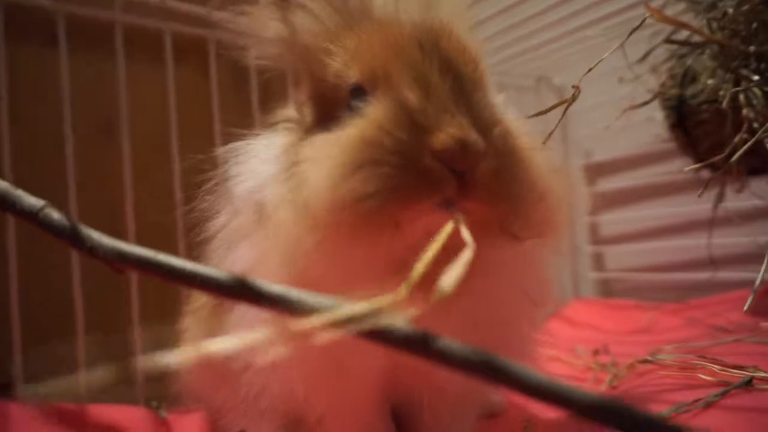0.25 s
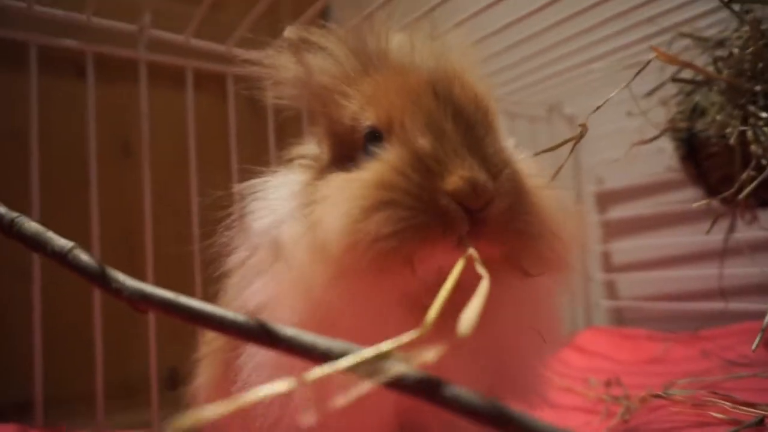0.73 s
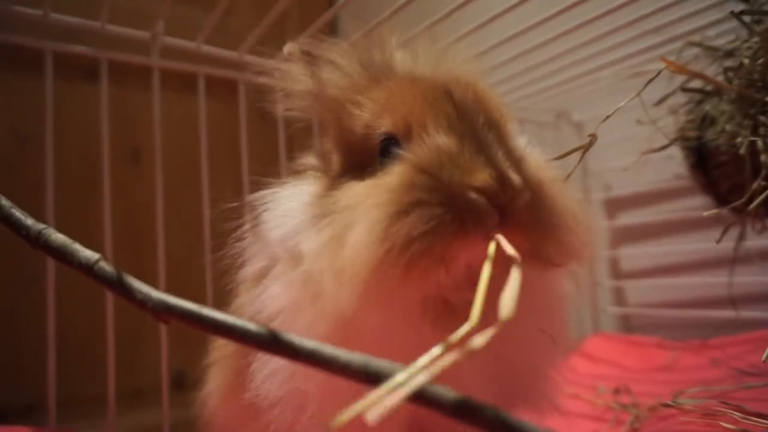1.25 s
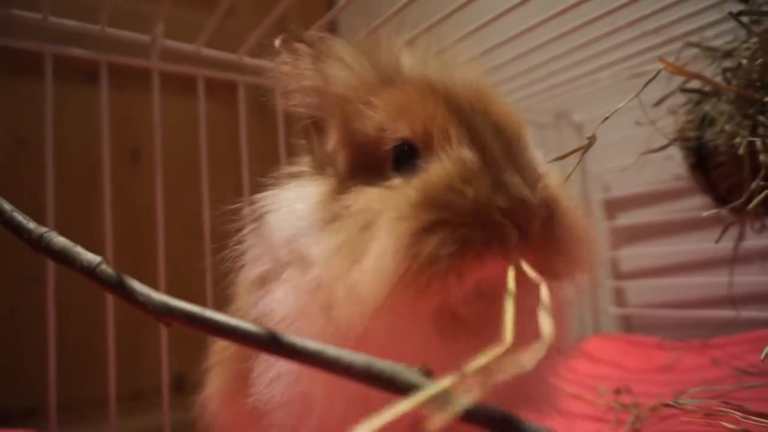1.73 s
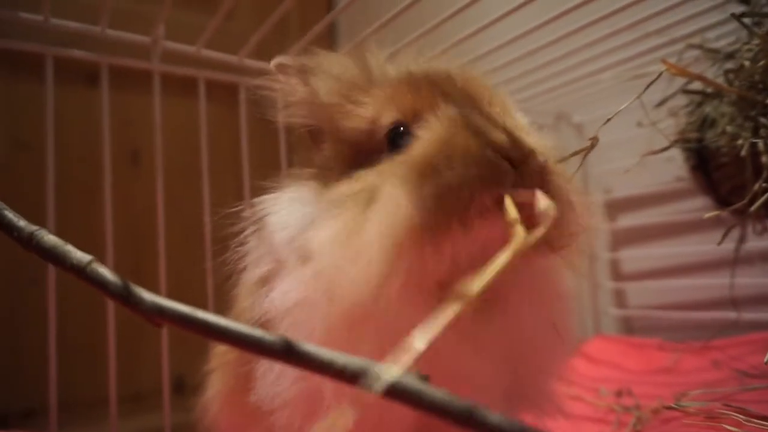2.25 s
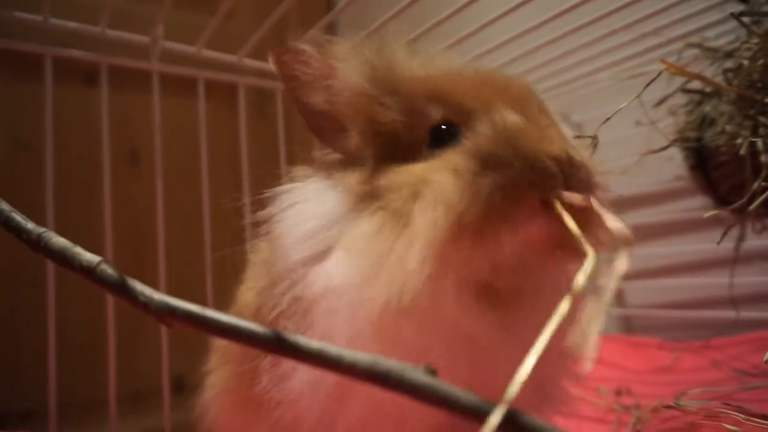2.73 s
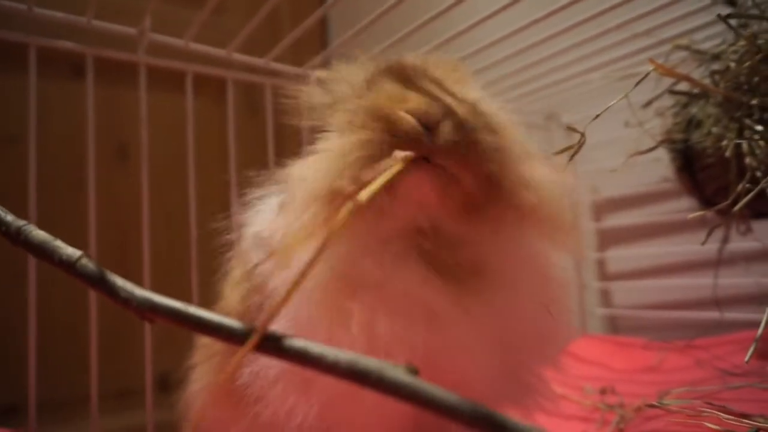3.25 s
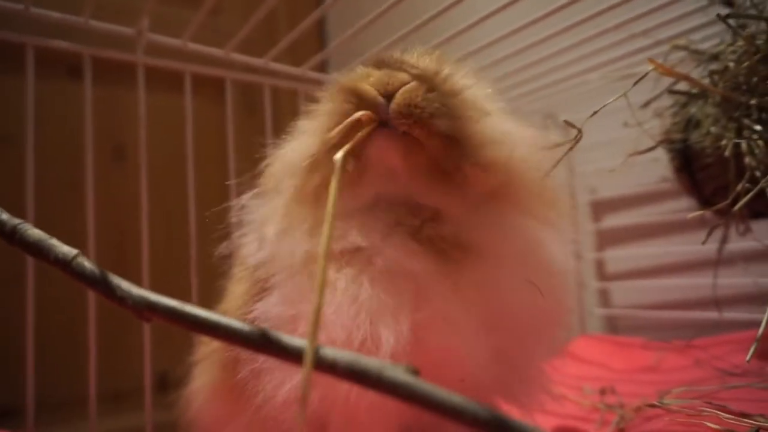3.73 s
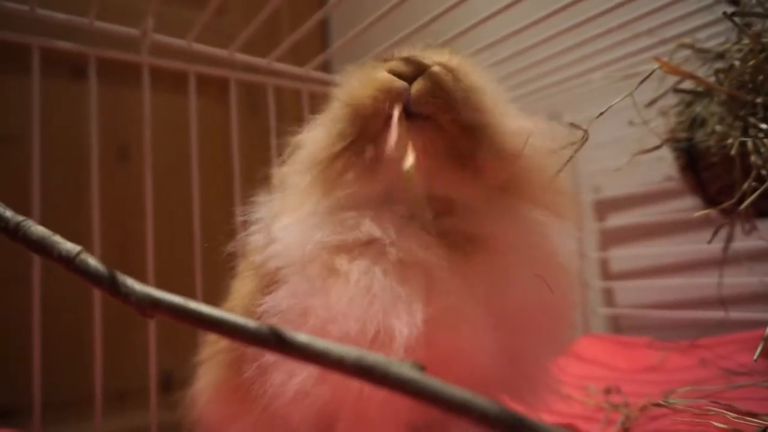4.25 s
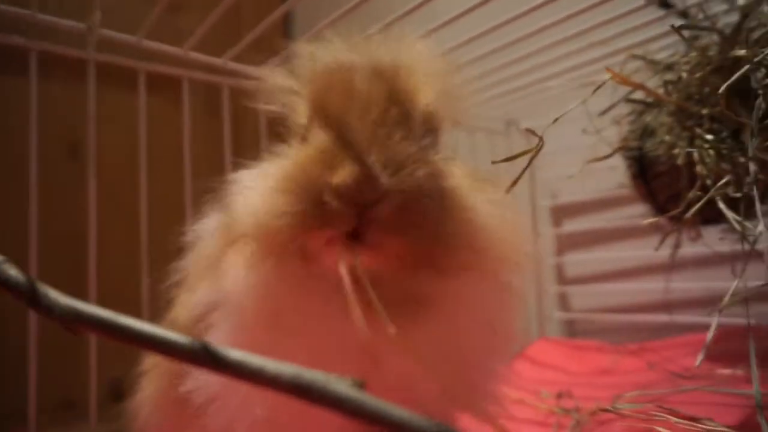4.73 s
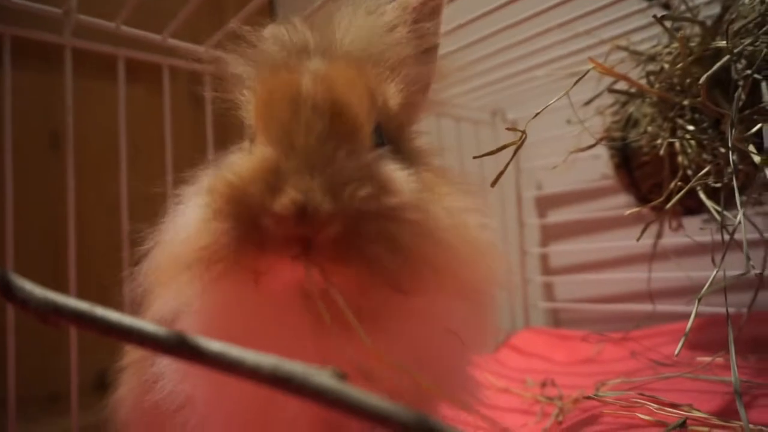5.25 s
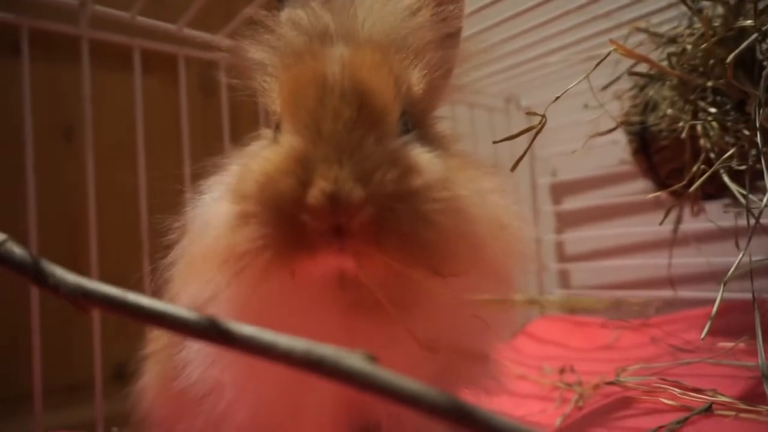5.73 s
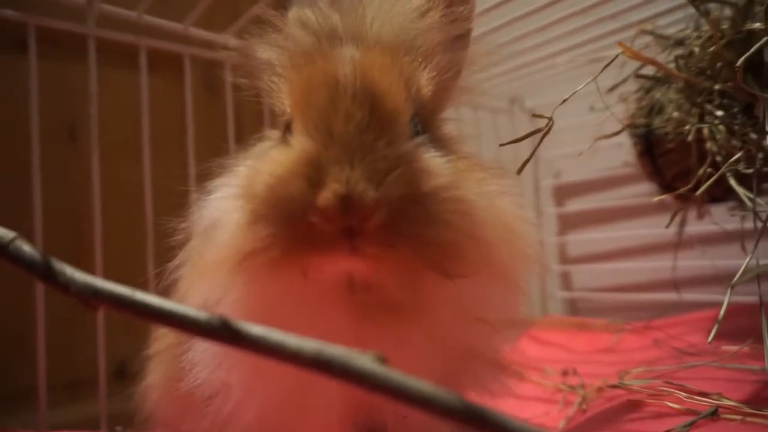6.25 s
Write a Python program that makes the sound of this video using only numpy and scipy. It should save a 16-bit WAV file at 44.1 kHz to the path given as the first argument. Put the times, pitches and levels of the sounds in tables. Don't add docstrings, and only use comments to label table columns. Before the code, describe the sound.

Very close to a small microphone, a rabbit chews dry hay in a wire cage. Brisk irregular snaps, tooth clacks and short grinds come over soft, deep knocks ringing through the camera body. Midway the low thumps thin out and bright scrapes and rustling ticks take over, then the chewing becomes sparser and lighter. Faint steady hiss and low hum lie beneath; it fades in quickly.

```python
import sys
import numpy as np
from scipy import signal
from scipy.io import wavfile
from scipy.ndimage import uniform_filter1d

SR = 44100
rng = np.random.default_rng(int(sys.argv[2]) if len(sys.argv) > 2 else 0)


def volts_from_decibels(level):
    exponent = np.asarray(level, float) / 20
    return 10 ** exponent


def unload_audio(sound):
    columns = np.transpose(np.atleast_2d(sound))
    steps = np.round(np.clip(columns, -1, 1) * 32767)
    wavfile.write(sys.argv[1], SR, steps.astype(np.int16))


N = 285887

# f/Hz, level/dB per Hz
HISS_SPECTRUM = [(15, -41), (25, -18), (108, -9), (217, -11), (301, -15), (394, -11), (427, -12.5),
                 (463, -13.5), (796, -13), (2160, -19), (2480, -18), (2840, -20), (16000, -26.5)]
# f/Hz, correlation/1
HISS_LIKENESS = [(60, 1), (130, 0.33), (290, -1.02), (640, -0.53), (1410, -0.26), (3100, -0.18),
                 (6820, -0.2), (15000, 0.62)]
# t/s, deep level/dB, upper level/dB
SHELF_SHAKE = [
    (0.2, -69, -72),
    (0.51, -54, -61.5),
    (2.5, -57, -59),
    (2.95, -63.5, -61),
    (5, -63, -62.5),
    (6.48, -69, -64.5),
]
# t/s, peak level/dB, f/Hz, t60/s
KNOCK_MODES = [(.41, -23, 63.8, 1), (0.408, -22.5, 38.6, 0.3), (.409, -28.5, 107.6, 0.26),
               (.42, -42, 165, 0.27), (0.609, -34.5, 137, 0.21), (.896, -35, 126.5, 0.39),
               (.95, -35.5, 32.4, .22), (1.225, -30, 108, 0.3), (1.23, -35, 166, 0.19),
               (1.268, -30, 40.4, 0.11), (1.551, -28, 160.6, 0.33), (1.582, -29.5, 89, 0.25),
               (1.6, -38, 32.8, 0.71), (1.561, -42.5, 286, 0.34), (1.865, -29, 115.5, 0.19),
               (1.898, -32.5, 37.3, 0.22), (2.21, -33, 105.5, 0.32), (2.238, -31, 38.3, 0.52),
               (2.553, -35.5, 194.6, 0.17), (2.567, -23.5, 80, 0.43), (2.616, -27.5, 135, 0.12),
               (2.62, -40, 292.3, 0.29), (3.161, -36, 293, 0.14), (4.279, -36.5, 152.4, 0.33),
               (4.325, -37.5, 94, 0.21), (.93, -40, 91, 0.32), (4.93, -42, 131, 0.285),
               (4.96, -45, 71, 0.26), (4.99, -45, 39.7, .3), (5.83, -48, 36, .4), (6.4, -46, 60, 0.22),
               (3.78, -48.5, 290, 0.17), (1.68, -41, 220, 0.15)]
# t/s, length/s, level/dB
SHOVES = [(0.205, 0.13, -48.5), (.41, 0.16, -48), (0.598, 0.047, -51), (0.897, 0.13, -51.5),
          (1.23, 0.11, -51.5), (1.544, 0.13, -44), (1.858, 0.16, -43), (2.194, 0.15, -42.5),
          (2.322, 0.24, -50.5), (2.559, 0.19, -44), (3.162, 0.11, -46.5), (3.46, 0.13, -51),
          (3.74, 0.061, -50.5), (4.278, 0.33, -55), (4.9, 0.31, -50)]
# t/s, length/s, level/dB
JAW_CREAKS = [(0.525, 0.058, -64), (0.906, 0.2, -69), (1.193, 0.21, -63), (1.892, 0.12, -64),
              (2.077, 0.028, -58.5), (3.495, 0.1, -59), (3.869, .06, -62), (5.201, 0.04, -59),
              (5.24, 0.037, -67), (5.335, .03, -66), (5.471, .045, -65), (5.516, 0.026, -55.5),
              (5.54, 0.068, -64), (5.708, .05, -61), (5.7, 0.28, -65), (2.3, .5, -69), (.95, 0.17, -68),
              (5.791, 0.061, -61.5), (5.841, 0.065, -63), (5.89, .06, -58), (5.944, .04, -66),
              (6.0, .04, -68)]
# f/Hz, width/Hz, level/dB
MOUTH = [
    (1650, 320, 0),
    (2200, 450, -7),
    (2850, 640, 0),
    (3600, 800, -14),
]
# t/s, length/s, level/dB, share that rings in the mouth/1
GRINDS = [(0.386, 0.12, -61.5, 0.7), (0.768, 0.028, -44, 0.8), (0.798, 0.017, -50, 0.88),
          (.775, .19, -56.5, 0.74), (.813, .014, -53, .8), (.839, 0.021, -50.5, 0.76),
          (.878, .018, -50, 0.7), (0.899, 0.031, -45.5, 0.6), (1.146, 0.31, -56, 0),
          (1.55, 0.14, -50, 0.05), (1.853, 0.26, -59, 0), (2.2, 0.17, -44, 0.01), (2.565, 0.18, -62, 0.61),
          (3.502, .06, -73, .5), (3.723, 0.07, -60.5, 1), (4.363, .015, -55, 0.05),
          (4.387, 0.058, -51, 0.02), (4.439, .012, -53, 0), (5.031, 0.14, -55, 0.56)]
# t/s, length/s, level/dB
CHEEK_RUBS = [(3.4, 0.035, -54.5), (3.438, .025, -48), (3.47, .02, -56), (3.496, 0.015, -52),
              (3.52, .04, -58), (0.508, .07, -58), (.722, .01, -55), (3.41, .14, -56.5),
              (4.695, 0.014, -55), (4.729, 0.007, -55), (4.737, 0.0096, -54), (4.845, .03, -58),
              (5.302, 0.027, -49.5), (6.384, 0.15, -60.5)]
# t/s, peak level/dB, f/Hz
CLACKS = [(.298, -33, 1270), (0.721, -50, 1540), (0.781, -37.5, 1130), (.8, -37.5, 1060), (.96, -46, 1936),
          (1.668, -42, 980), (3.501, -40.5, 2670), (4.39, -37, 1490), (4.407, -36.5, 1680),
          (4.608, -48, 1600), (4.631, -46.5, 700), (2.811, -51, 1900), (2.82, -51, 2395),
          (2.987, -49, 2760), (3.031, -49, 1880), (3.359, -49, 2740), (3.976, -41, 1810),
          (1.472, -38.5, 1700), (4.537, -55, 1990), (4.7, -56, 1790), (4.811, -44, 1760), (5.04, -47, 1730),
          (5.055, -47, 1780), (5.303, -39.5, 570), (5.316, -44, 2700)]
# t/s, level/dB
RUSTLE = [(.25, -78), (1.4, -76), (2.3, -75), (2.9, -74.5), (3.3, -70), (3.5, -62), (3.62, -70), (3.9, -75),
          (4.2, -65), (4.65, -65), (4.8, -75), (5.6, -72.5), (6.1, -77), (6.48, -74)]
# t/s, peak level/dB
TICKS = [(.62, -54), (1.452, -48), (1.565, -50), (1.602, -53), (2.197, -44), (2.222, -46), (2.986, -47),
         (3.07, -50), (3.085, -56), (3.224, -46), (3.297, -45), (3.409, -50), (3.428, -48), (3.523, -46),
         (3.541, -43), (3.545, -47), (3.563, -44), (3.626, -46), (3.66, -48.5), (3.79, -49), (3.876, -46),
         (4.04, -40), (4.09, -38), (4.154, -40), (4.192, -42), (4.22, -46), (4.229, -46.5), (4.243, -48),
         (4.262, -48), (4.271, -44), (4.291, -45), (4.32, -45), (4.352, -44), (4.367, -41), (4.385, -48),
         (4.423, -48), (4.443, -43), (4.472, -51), (4.487, -47), (4.498, -47), (4.525, -45), (4.534, -42),
         (4.551, -45), (4.562, -48), (4.574, -46), (4.583, -41), (4.629, -43), (4.638, -40), (4.645, -44),
         (4.719, -44), (4.79, -47), (5.538, -47), (5.634, -45), (5.718, -51), (5.804, -48), (5.905, -39),
         (5.931, -45), (5.965, -49), (6.02, -48), (6.142, -49)]
# t/s, length/s, level/dB, body level/dB
SCRAPES = [(1.214, 0.066, -54.5, -3.5), (1.472, 0.032, -46, -9), (1.654, 0.1, -54, 5.5),
           (1.659, .01, -50, -3), (1.91, 0.051, -62, 3), (2.387, 0.018, -39, -9.5), (2.395, .06, -49, -9),
           (2.548, 0.16, -54, 5), (3.124, 0.038, -43, -9), (3.216, 0.015, -47.5, -10.5),
           (3.26, 0.035, -59, -2), (3.347, 0.023, -52.5, -5), (3.434, 0.036, -34, -18),
           (3.493, 0.028, -38.5, -16), (3.705, 0.027, -41.5, -18), (3.73, 0.021, -38, -12),
           (3.754, 0.013, -32, -19.5), (3.907, 0.012, -51, -20), (3.965, 0.035, -35, -16.5),
           (4.001, 0.026, -45, -15), (4.072, 0.034, -42, -23), (4.526, 0.02, -50.5, -16),
           (5.295, 0.074, -51, -10), (5.385, 0.012, -49, -19), (5.569, 0.025, -43.5, -19),
           (5.632, 0.024, -60, -6), (5.854, 0.013, -53, -31), (5.91, 0.011, -37.5, -47),
           (5.944, 0.006, -38, -36), (6.004, 0.02, -50, -28), (6.133, .012, -56, -38),
           (6.381, 0.21, -53, -9)]
# t/s, peak level/dB, body level/dB and edge level/dB relative to the top
BITES = [(0.2977, -32, 1, -10), (0.5096, -30.5, -12.5, -3), (0.5544, -37, 0.5, -4),
         (1.2126, -30, -12.5, -5), (1.4817, -20, -22, -8.5), (1.6423, -14.5, -22, -5),
         (1.6495, -26.5, -11.5, 7), (1.6878, -27, 0.5, -9), (1.7047, -26, -12.5, -3.5),
         (2.119, -23.5, -17, -9), (2.3267, -14, -32, -12), (2.33, -23.5, -15.5, -21),
         (2.3719, -23.5, -19, -18), (2.393, -24.5, -23, -5), (2.554, -22.5, -14, -6.5),
         (2.9596, -33, -22, -3), (3.135, -28.5, -13, -2), (3.2682, -31, -7, -12), (3.4537, -26, -14, -3),
         (3.6944, -15, -25, -15), (3.958, -24, -21, -9), (3.9628, -26, -23, -16),
         (4.182, -20.5, -17, -10.5), (4.3379, -20.5, -26.5, -11), (4.6167, -28, -12, -13),
         (4.8499, -28, -7.5, -37), (5.0906, -30, -9.5, -20), (5.1408, -21.5, -40, -21),
         (5.5625, -23, -28, -17), (5.948, -18.5, -48, -48)]
# t/s, peak level/dB
NODES = [(.3218, -41.5), (.7212, -45), (.7812, -40.5), (.9598, -44), (.562, -34.5), (.7488, -43),
         (.8, -39.5), (.9967, -38), (1.0319, -39.5), (1.0444, -35), (1.1772, -40.5), (1.2684, -38.5),
         (1.4076, -41.5), (1.4722, -37.5), (1.6628, -39), (1.9079, -44), (2.2777, -41), (2.7602, -45.5),
         (2.9058, -44), (3.0548, -41.5), (3.254, -41), (3.5636, -51), (4.1937, -40), (4.4073, -36.5),
         (4.6071, -45), (4.63, -39), (4.8432, -32.5), (4.899, -48), (5.0738, -35), (5.0778, -59),
         (5.102, -40.5)]
# t/s, peak level/dB
STEMS = [(.304, -39), (.3125, -35.5), (1.3826, -36.5), (1.5164, -33.5), (1.884, -33.5), (2.1515, -34),
         (2.4368, -36), (2.5125, -40), (2.5217, -39), (2.8427, -40.5), (3.1178, -39), (3.143, -31),
         (3.214, -34.5), (3.2777, -43), (3.294, -45), (3.4687, -32), (3.4812, -34), (3.567, -39.5),
         (3.972, -34), (4.1633, -36), (4.3681, -40), (4.444, -47), (5.3004, -37), (5.3537, -37),
         (5.582, -34)]
# t/s, peak level/dB
BLADES = [(0.57, -34), (1.4774, -25), (2.0932, -43), (2.4433, -31), (3.6732, -32), (3.6, -25.5),
          (4.5, -28.5), (4.151, -36), (4.155, -41), (3.9752, -27), (3.4465, -29), (3.762, -26),
          (3.711, -35), (3.737, -31), (5.9115, -39), (5.5, -31), (3.497, -33), (4.5355, -44), (4.7186, -44),
          (5.3823, -34), (5.4189, -38), (5.5727, -41), (5.6679, -41), (5.7428, -42), (5.9153, -46.5),
          (5.9035, -44), (5.803, -47), (5.9445, -44), (4.198, -36), (6.0103, -36.5)]
# t/s, left-right level/dB
HEAD = [
    (0, -4),
    (3.4, 10),
    (3.7, -4.5),
    (6.48, 3),
]
# low f/Hz, high f/Hz
STALK_REGIONS = [
    (11500, 15500),
    (8000, 11000),
    (4800, 8000),
    (1200, 3400),
]
# t/s, level/dB
FADE = [
    (0, -56),
    (.08, -40),
    (.15, -31.5),
    (.2, -29.5),
    (.27, -20.5),
    (.33, -5),
    (.4, -5),
]


def along(rows):
    s, *columns = np.transpose(rows)
    return [np.interp(np.arange(N) / SR, s, column) for column in columns]


def add(mix, s, sound):
    part = mix[..., round(s * SR):][..., :sound.shape[-1]]
    part += sound[..., :part.shape[-1]]


def evened(x):
    return x / np.sqrt(np.mean(x ** 2) + 1e-20)


def leaned(db):
    return volts_from_decibels(db * np.array([[.5], [-.5]]))


def band(x, lo_hz, hi_hz):
    sos = signal.butter(2, [lo_hz, hi_hz], "band", fs=SR, output="sos")
    return signal.sosfilt(sos, x) * np.sqrt(SR / 2 / (hi_hz - lo_hz))


def resonate(x, hz, width):
    return signal.lfilter(*signal.iirpeak(hz, hz / width, SR), x)


def crackle(shape, spread_db):
    size_db = spread_db * np.minimum(rng.exponential(1, shape), 4)
    return evened(rng.standard_normal(shape) * volts_from_decibels(size_db))


def pair(length, same, spread_db):
    a, b = crackle((2, length), spread_db)
    shifted = np.roll(a, rng.choice([-1, 0, 0, 1]))
    return np.array([a, same * shifted + np.sqrt(1 - same ** 2) * b])


def stroke(length, same, spread_db, lumps_db, lean=0.7):
    u = np.linspace(0, 1, round(length * SR))
    lumps = volts_from_decibels(lumps_db * evened(uniform_filter1d(rng.standard_normal(len(u)), size=90)))
    fade = volts_from_decibels(-150 * (1 - lean) * length * u)
    return pair(len(u), same, spread_db) * lumps * np.sin(np.pi * u ** lean) ** 1.1 * fade


def hiss():
    frames, hz = N // 256 + 5, np.fft.rfftfreq(1024, 1 / SR)
    a, b, c, d, patches = rng.standard_normal((frames, 513, 5)).T
    patches = evened(uniform_filter1d(uniform_filter1d(patches, 12, 0), 10, 1))

    def read(rows):
        table_hz, values = np.transpose(rows)
        return np.interp(np.log(hz + 1), np.log(table_hz), values)[:, None]

    same = np.clip(read(HISS_LIKENESS), -1, 1)
    left = a + 1j * b
    right = same * left + np.sqrt(1 - same ** 2) * (c + 1j * d)
    spectrum = np.array([left, right]) * volts_from_decibels(read(HISS_SPECTRUM) + 1.4 * patches)
    noise = evened(signal.istft(spectrum, nperseg=1024, noverlap=768)[1][:, :N])
    drone = evened(resonate(rng.standard_normal(N), 101.2, 7.8))
    return volts_from_decibels(-52) * noise + volts_from_decibels(-57.5) * drone


def shelf():
    t, out = np.arange(SR) / SR, np.zeros(N)
    wobble = 1 + .05 * evened(uniform_filter1d(rng.standard_normal((len(KNOCK_MODES), SR)), 900))
    for (s, db, hz, t60), pitch in zip(KNOCK_MODES, wobble):
        rise = 0.0075 + 0.056 * t60 ** 2
        swell = np.sin(np.pi / 2 * np.minimum(t / rise, 1)) ** 2
        ring = np.sin(2 * np.pi * hz * np.cumsum(pitch) / SR)
        add(out, s, volts_from_decibels(db - 60 * np.maximum(t - rise, 0) / t60) * swell * ring)
    deep_db, upper_db = along(SHELF_SHAKE)
    out += volts_from_decibels(deep_db + 6.5) * band(rng.standard_normal(N), 21, 124)
    out += volts_from_decibels(upper_db) * band(rng.standard_normal(N), 124, 460)
    return out


def shoves():
    push = np.zeros((2, N))
    for s, length, db in SHOVES:
        add(push, s, volts_from_decibels(db) * stroke(length, 0.97, 1.6, 3.24))
    return band(push, 80, 226) + 0.57 * band(push, 142, 411)


def cage(x):
    at = np.arange(60, 6000, 20) + rng.integers(0, 20, (2, 297))
    taps = np.zeros((2, 6100))
    decay = volts_from_decibels(-60 * at / SR / 0.3)
    np.put_along_axis(taps, at, rng.choice([-1., 1.], at.shape) * decay, 1)
    return signal.fftconvolve(x, taps / np.linalg.norm(taps[0]), axes=1)[:, :N]


def jaw_ring(x):
    edges = 997 - 105 / 2, 997 + 105 / 2
    return evened(band(band(x, *edges), *edges))


def creaks():
    out = volts_from_decibels(-73) * jaw_ring(pair(N, 0.5, 3.7))
    for s, length, db in JAW_CREAKS:
        creak = np.pad(stroke(length, .9, 1.5, 1.5, lean=.9), ((0, 0), (0, 600)))
        add(out, s - .008, volts_from_decibels(db - 1.5) * jaw_ring(creak) * np.array([[.8], [1]]))
    return out


def grinds():
    rings, dull = np.zeros((2, 2, N))
    for s, length, db, share in GRINDS:
        grit = volts_from_decibels(db) * stroke(length, .5, 3.5, 4, lean=1 if share > .6 else .6)
        add(rings, s, share * grit)
        add(dull, s, (1 - share) * grit)
    mouth = sum(volts_from_decibels(db) * resonate(resonate(rings, hz, width), hz, width) for hz, width, db in MOUTH)
    return 10.5 * mouth + 0.33 * band(band(dull, 860, 2760), 880, 2720)


def cheek_rubs():
    rubs = np.zeros((2, N))
    hz, width = 3050, 1470
    for s, length, db in CHEEK_RUBS:
        add(rubs, s, volts_from_decibels(db) * stroke(length, 0.43, 5.5, 4.7, lean=1.0))
    return 4.7 * resonate(resonate(rubs, hz, width), hz, width)


def clacks():
    t, out = np.arange(600) / SR, np.zeros((2, N))
    for s, db, hz in CLACKS:
        ring = sum(gain * np.sin(2 * np.pi * ratio * hz * t) for ratio, gain in ((1, 1), (.65, .31), (1.28, .5)))
        add(out, s, volts_from_decibels(db + 4.5 - 60 * t / 0.0094) * ring * np.ones((2, 1)))
    return out


def rustle():
    clumps = evened(volts_from_decibels(3.0 * evened(uniform_filter1d(rng.standard_normal(N), size=120))))
    out = volts_from_decibels(along(RUSTLE)[0]) * pair(N, 0.94, 3.3) * (0.86 + 0.63 * clumps)
    for s, db in TICKS:
        add(out, s - .001, volts_from_decibels(db - 8.0) * stroke(.007, .9, 2.0, 1.5, lean=.6))
    edges = 12900, 15400
    return 0.68 * band(band(out, *edges), *edges)


def scrapes():
    for s, length, db, body_db in SCRAPES:
        burst = volts_from_decibels(db) * stroke(length, 0.26, 6.5, 1.9, lean=.6 if length > .035 else 1)
        yield s, burst, 0.94 * body_db, body_db


def snap_list():
    rows = [(*row, np.interp(row[0], *np.transpose(HEAD))) for row in BITES]
    # (body dB, edge dB) of each kind
    for table, colour_db in ((NODES, (-2, -6.5)), (STEMS, (-12.5, -4.5)), (BLADES, (-43, -16))):
        rows += [(*row, *colour_db, -1.5) for row in table]
    return [(*row, pan_db + 3.5 * rng.standard_normal()) for *row, pan_db in rows]


def snaps():
    lead_s, crack_t60, splinter_t60 = .003, .0021, 0.087
    t = np.arange(900) / SR - lead_s
    crack = volts_from_decibels(-60 * abs(t) / crack_t60) + volts_from_decibels(-26 - 60 * abs(t) / splinter_t60)
    shape = np.where(t < 0, volts_from_decibels(-18.5) * (1 + t / lead_s) ** 2, crack)
    for s, db, body_db, edge_db, pan_db in snap_list():
        burst = evened(pair(len(shape), 0.81, 0.16) * shape)
        yield s - lead_s, burst * volts_from_decibels(db - 18.0) * leaned(pan_db), edge_db, body_db + 5.5


def filled(burst, lo_hz, hi_hz):
    part = band(burst, lo_hz, hi_hz)
    return burst * np.std(burst) / np.hypot(.92 * np.std(part.mean(0)), .35 * np.std(part))


def stalks():
    regions = np.zeros((4, 2, N))
    for s, burst, edge_db, body_db in [*snaps(), *scrapes()]:
        levels_db = 0, .5 * edge_db + 2.0, edge_db - 1.0, body_db - 1.5
        for region, hz, db in zip(regions, STALK_REGIONS, levels_db):
            add(region, s, filled(burst, *hz) * volts_from_decibels(db))
    tilts_db = -1.5, 2.5, -0.5, -3
    top, upper, edge, body = (region * leaned(db) for region, db in zip(regions, tilts_db))
    out = 1.046 * band(top, 12280, 15730) - 0.74 * band(upper, 7980, 11310)
    out += band(edge, 4260, 11020) - band(body, 1600, 3310)
    return out + 0.5 * band(body, 520, 1210)


def scene():
    near = creaks() + grinds() + cheek_rubs() + clacks() + rustle() + stalks()
    return hiss() + shelf() + shoves() + volts_from_decibels(-16) * cage(near) + near


def top_cut(x):
    return signal.sosfilt(signal.butter(12, 16990, fs=SR, output="sos"), x)


def low_pass(x, hz, beta):
    return signal.oaconvolve(x, signal.firwin(511, hz, window=("kaiser", beta), fs=SR)[None], "same")


def record(dry):
    x = .3 * np.tanh(dry * volts_from_decibels(along(FADE)[0]) / .3)
    kept = low_pass(x, 15850, 6)
    above = low_pass(x, 16850, 8) - kept
    sharp = uniform_filter1d((above ** 2).mean(0), size=200) > volts_from_decibels(2 * -47)
    opened = uniform_filter1d(sharp * 1., size=200)
    return top_cut(kept + volts_from_decibels(-13) * above * opened)


dry = scene()
out = record(dry)
unload_audio(out)
```